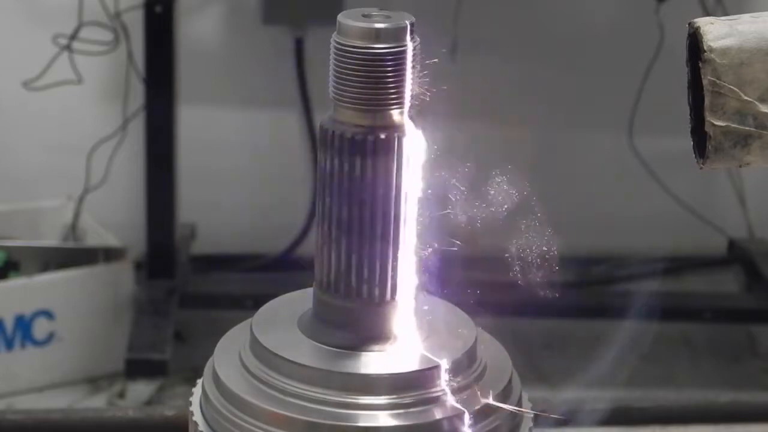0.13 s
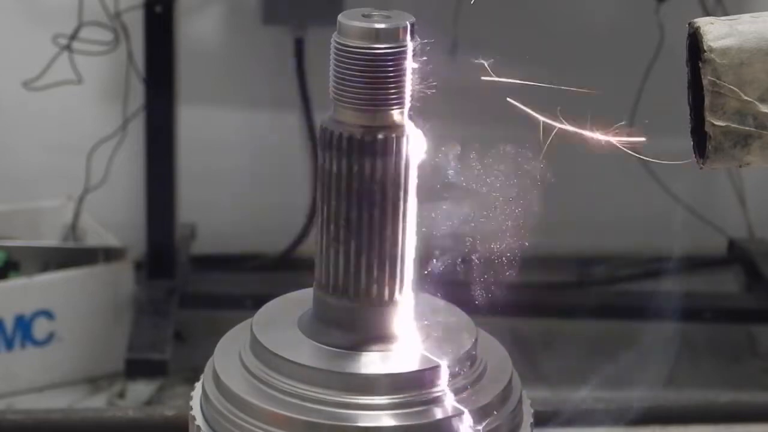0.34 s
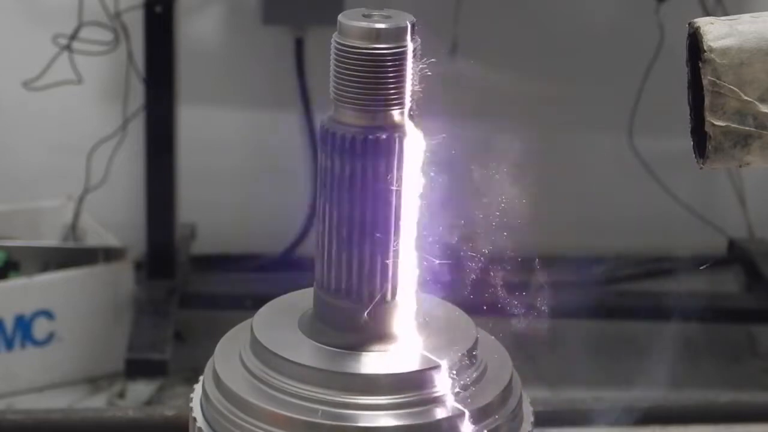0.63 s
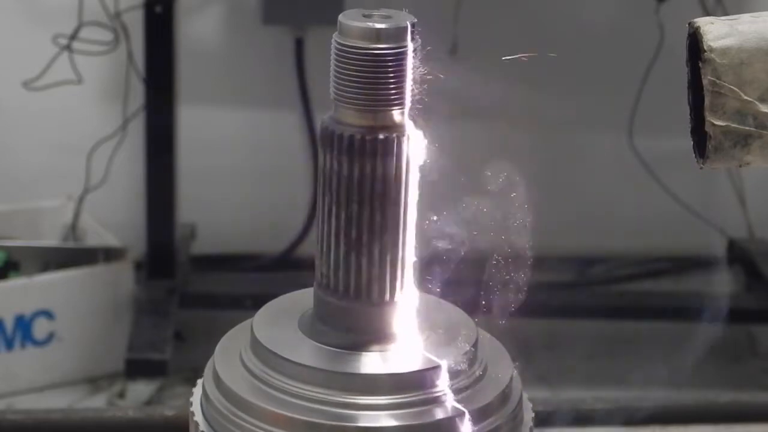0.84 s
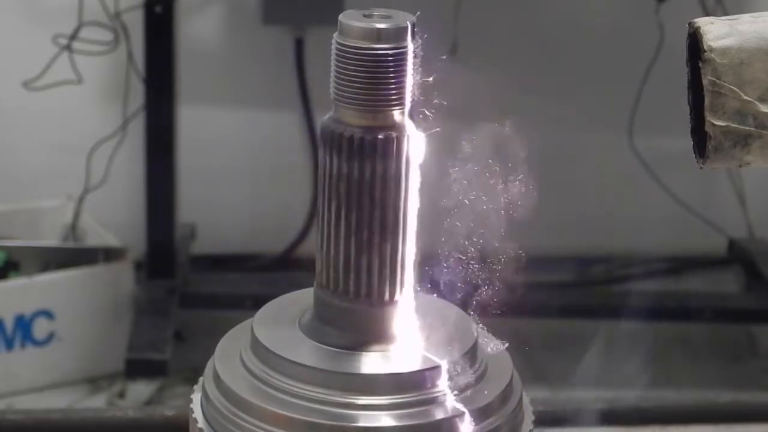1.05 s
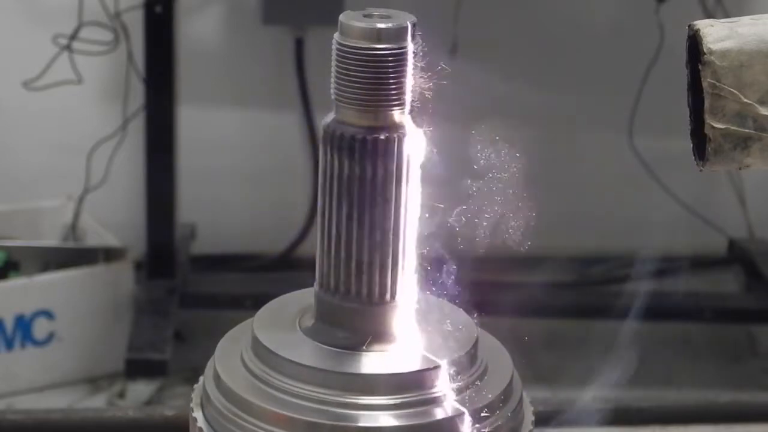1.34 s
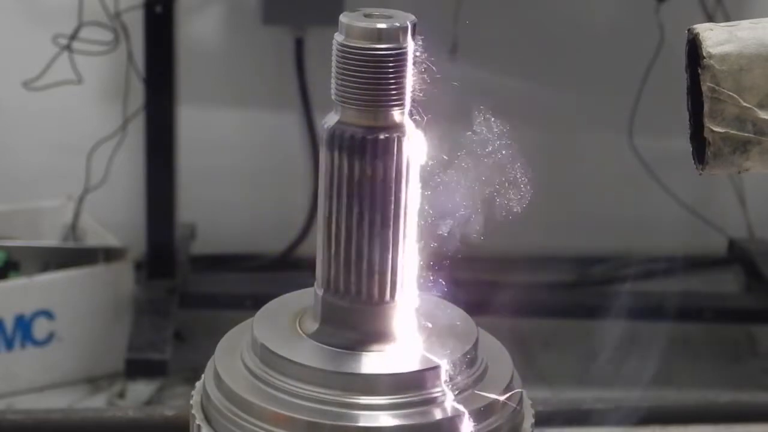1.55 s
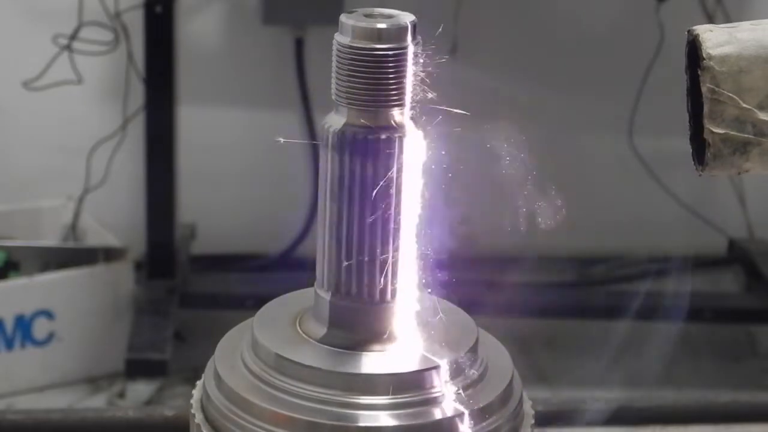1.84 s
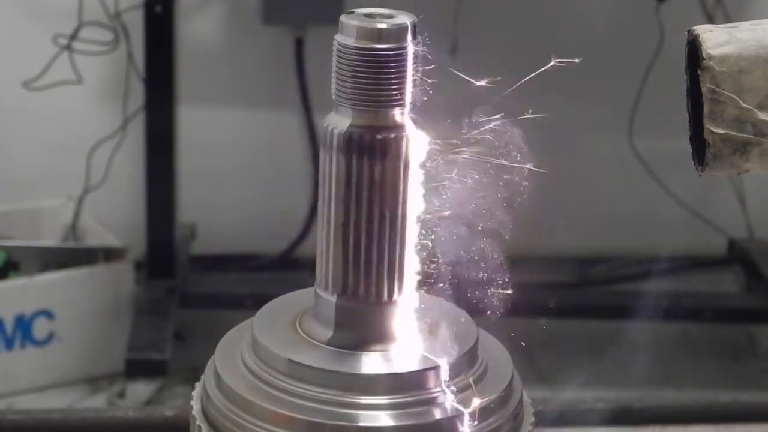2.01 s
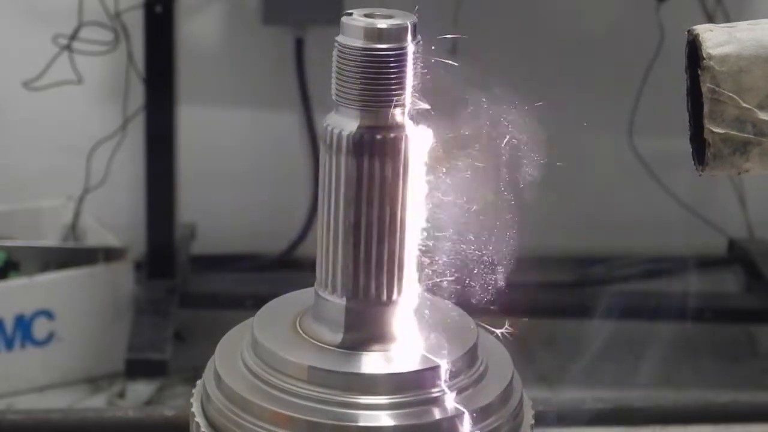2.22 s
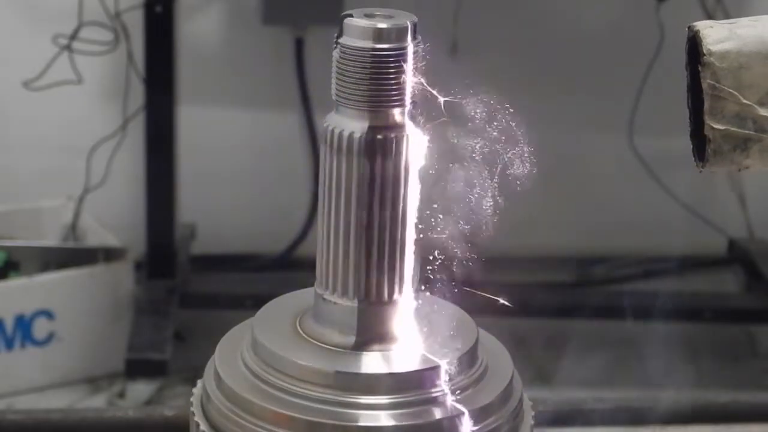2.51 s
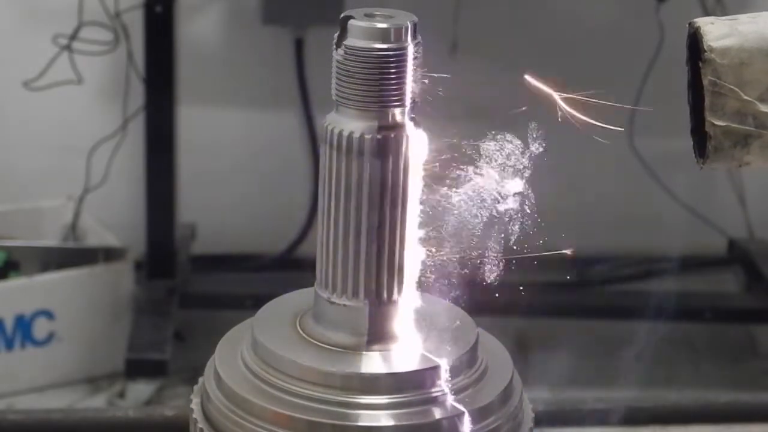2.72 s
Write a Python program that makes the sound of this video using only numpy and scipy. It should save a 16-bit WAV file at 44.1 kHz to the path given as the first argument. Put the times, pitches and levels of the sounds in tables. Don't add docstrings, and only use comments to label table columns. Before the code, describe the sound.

Hard, crackling electric-like buzz of laser cleaning on metal, with sputtering flares and a low pulsing drone.

```python
import sys
import numpy as np
from scipy import signal
from scipy.fft import rfft, irfft
from scipy.io import wavfile
from scipy.ndimage import uniform_filter1d

SR = 44100
rng = np.random.default_rng(int(sys.argv[2]) if len(sys.argv) > 2 else 0)


def voltage_ratio(level):
    return 10 ** (np.asarray(level, float) / 20)


def int16_out(signal):
    q = np.round(np.clip(np.atleast_2d(signal).T, -1, 1) * 32767)
    wavfile.write(sys.argv[1], SR, q.astype(np.int16))


N = 126126
TIME_S = np.arange(N) / SR
BIN_HZ = np.maximum(np.arange(N // 2 + 1) * SR / N, 1)
LEFT_RIGHT = np.array([[1], [-1]])

SWEEP_HZ, FIRST_SWEEP_S = 160.477, .005443
TURN_FIRST_S, TURN_S = .2415, .2417
GUST_LATE_S = .05


def level(x, db):
    return x * voltage_ratio(db) / np.sqrt(np.mean(x ** 2))


def read(table, hz):
    f, db = np.array(table).T
    return np.interp(np.log(hz), np.log(f), db)


def follow(table, t):
    return np.interp(t, *np.array(table).T)


def band(x, hz, width_hz):
    return signal.lfilter(*signal.iirpeak(hz, hz / width_hz, fs=SR), x)


def walk(rate, count=N, per_s=SR):
    hold = max(int(per_s / rate), 1)
    steps = np.repeat(rng.standard_normal(count // hold + 1), hold)
    return 2.19 * uniform_filter1d(uniform_filter1d(steps, hold), hold)[:count]


def clicks(times, sizes):
    out = np.zeros(N + 1024)
    at = times * SR + 512
    idx = np.floor(at)[:, None] + np.arange(-7, 9)
    off = idx - at[:, None]
    pulse = np.sinc(off) * np.cos(np.pi * off / 16) ** 2
    np.add.at(out, idx.astype(int), sizes[:, None] * pulse)
    return out[512:512 + N]


def air(table, flicker_db, rate, channels=1):
    out = 0
    for hz in 25 * 2 ** np.arange(0, 9.4, 1 / 3):
        octaves = np.log2(BIN_HZ / hz)
        shape = np.cos(np.pi / 2 * np.clip(3 * octaves, -1, 1)) * voltage_ratio(read(table, BIN_HZ))
        flicker = voltage_ratio(flicker_db * walk(rate))
        out = out + flicker * irfft(shape * rfft(rng.standard_normal((channels, N))), N)
    return out


def beat(late_s, ms):
    gap = (TIME_S - TURN_FIRST_S - late_s + TURN_S / 2) % TURN_S - TURN_S / 2
    return np.exp(-(gap * 1000 / ms) ** 2)


STROKE_S, STROKE_EDGE_S = .108, .008


def stroke():
    left = (TURN_FIRST_S + STROKE_EDGE_S - TIME_S) % TURN_S
    return uniform_filter1d(1. * (left < STROKE_S), size=int(2 * STROKE_EDGE_S * SR))


def room(x):
    t = np.arange(int(SR / 2)) / SR
    t60_s, room_db = .08, -18
    tail = rng.standard_normal(len(t)) * voltage_ratio(-60 * t / t60_s) * (t > .003)
    return signal.fftconvolve(x, tail / np.sqrt(np.sum(tail ** 2)))[:N] * voltage_ratio(room_db)


# f/Hz, level/dB
HISS_SPECTRUM = [(600, -17.5), (1500, -9), (2500, -4.5), (4700, 0.5), (6300, 2.5), (9000, -11), (13000, -6),
                 (14500, -29)]


def workshop_hiss():
    return level(air(HISS_SPECTRUM, 1.0, 6.83)[0], -30) * voltage_ratio(1.5 * stroke())


# f/Hz, side level/dB
HISS_WIDTH = [(500, 2), (1200, -4.5), (2500, -12.5), (3500, -14.5), (5200, -7.5), (7500, -29.5),
              (10000, -6.5), (12800, 0.5)]


def stereo_side(hiss, mid):
    other = np.roll(hiss, int(3 * TURN_S * SR))
    lean = .15
    return irfft(rfft(other + lean * mid) * voltage_ratio(read(HISS_WIDTH, BIN_HZ)), N)


# f/Hz, level/dB
DRONE_SPECTRUM = [(25, -13), (80, -10), (150, 6), (220, 7), (320, 0), (420, -10), (800, -18.5), (1600, -25)]


def extractor_drone():
    middle, apart = level(air(DRONE_SPECTRUM, 0.67, 6.04, channels=2), -39.5)
    rumble = level(band(apart, 35, 30), -62)
    drone_left_db, side_db = 3, -12.5
    stereo = middle + LEFT_RIGHT * (voltage_ratio(side_db) * apart + rumble)
    return stereo * voltage_ratio(LEFT_RIGHT * drone_left_db / 2)


def extractor_puffs():
    puff_db, puff_ms, weak_db = -31.5, 2.1, -7
    k = np.arange(-2, 33)
    db = puff_db + weak_db * (k % 3 > 0) - 5.0 * (k % 3 == 1)
    size = voltage_ratio(db + 1.7 * rng.standard_normal(len(k)))
    gap = (TIME_S - (TURN_FIRST_S + k[:, None] * TURN_S / 3)) * 1000 / puff_ms
    return -(size[:, None] * np.exp(-gap ** 2)).sum(axis=0)


def fume_thud():
    rush = band(rng.standard_normal(N), 870, 390)
    gust = beat(GUST_LATE_S, 17.5) * voltage_ratio(2.3 * walk(4.85)) * rush
    thud_left_db = 5.5
    return level(gust, -51) * voltage_ratio(LEFT_RIGHT * thud_left_db / 2)


def sweep_tones(t, table):
    n = len(t)
    when = np.r_[t[0] - 1 / SWEEP_HZ, t, t[-1] + 2 / SWEEP_HZ]
    turns = np.interp(TIME_S, when, np.r_[-1, np.arange(n), n + 1])
    out = 0
    for k, db, lag in table:
        tone = np.cos(2 * np.pi * round(k) * turns - lag)
        out = out + np.sqrt(2) * voltage_ratio(db + 1.8 * walk(25.36)) * tone
    return out


# multiple of the sweep, level/dB, lag/rad
WHINE = [(2, -41.5, 0.94), (4, -52.5, 1.1)]


def extractor_motor(t):
    start_db, end_db = 4.5, 10
    swell = start_db * beat(2 * STROKE_EDGE_S - STROKE_S, 14) + end_db * beat(-0.005, 10)
    rush = level(band(rng.standard_normal(N), 540, 480), -45.5)
    return stroke() * voltage_ratio(swell) * (sweep_tones(t, WHINE) + rush)


# multiple of the sweep, level/dB, lag/rad
HUM = [(1, -55, -0.49), (2, -45, 0.48), (3, -55, -0.028), (4, -58.5, 0.79), (5, -62.5, -0.2)]


def sweep_hum(t):
    surge_db, hum_left_db = 7, 2.5
    swell = voltage_ratio(surge_db * beat(GUST_LATE_S, 19) + LEFT_RIGHT * hum_left_db / 2)
    return sweep_tones(t, HUM) * swell


# t/s, lateness/ms
MIRROR_DRIFT = [(0.012, 0.91), (0.143, 0.54), (0.23, 0.14), (0.305, 0.04), (0.348, -0.16), (0.379, -0.16),
                (0.448, -0.38), (0.504, -0.27), (0.56, -0.04), (0.641, 0.04), (0.697, -0.13),
                (0.741, -0.06), (0.797, -0.12), (0.853, -0.43), (0.903, -0.38), (0.984, -0.45),
                (1.171, -0.17), (1.227, -0.15), (1.277, -0.23), (1.351, -0.07), (1.414, 0.19), (1.476, 0.1),
                (1.563, 0.28), (1.582, 0.25), (1.613, 0.01), (1.657, -0.03), (1.694, -0.16), (1.738, -0.01),
                (1.806, -0.19), (1.937, 0.0), (1.981, -0.31), (2.031, -0.25), (2.062, -0.11),
                (2.162, -0.08), (2.311, 0.18), (2.355, 0.01), (2.417, 0.13), (2.473, -0.06), (2.585, 0.29),
                (2.648, 0.27), (2.685, 0.17), (2.741, 0.3), (2.803, 0.24), (2.835, 0.13)]


def sweeps():
    t = FIRST_SWEEP_S + np.arange(int(N / SR * SWEEP_HZ)) / SWEEP_HZ
    jitter_ms, sway_ms = .013, .012
    shake = jitter_ms * rng.standard_normal(len(t)) + sway_ms * walk(40, count=len(t), per_s=SWEEP_HZ)
    return t + (follow(MIRROR_DRIFT, t) + shake) / 1000


# t/s, level/dB
SPLINE_RING = [(0, 3), (.6, -0.5), (1.4, -0.5), (1.6, -2.5), (2.2, -6.5), (2.86, -.5)]


def ring_splines(x):
    return x + (voltage_ratio(follow(SPLINE_RING, TIME_S)) - 1) * band(x, 6280, 270)


# place/ms, polarity, level/dB
SHOULDERS = [
    (-2.63, 1, -4.5),
    (-1.72, 1, -14),
    (-1.44, -1, -1),
    (-.93, -1, -16),
    (-.55, -1, -14),
    (-.03, 1, 0),
    (.84, 1, -11),
    (1.04, -1, -5.5),
    (2.02, -1, -13),
]
# ring f/Hz, width/Hz, sputter level/dB
CRACKS = [(3700, 3900, -6), (3800, 4800, -9), (4240, 4100, -6), (4860, 1700, -18), (4400, 2600, -17),
          (4540, 2830, -3), (6340, 8000, -6), (3760, 4900, -10), (3780, 3900, -15)]
# t/s, stretch of their lead
STRETCH = [(0, .985), (1.1, .99), (1.7, 1.017), (2.86, 1.008)]
# t/s, level/dB
COATING = [(0, -23), (.25, -19.5), (.48, -20.5), (.62, -19), (.9, -20), (1.1, -20), (1.45, -19), (1.7, -20),
           (1.85, -17.5), (1.93, -20), (2.02, -18), (2.2, -19.5), (2.3, -20), (2.55, -21.5), (2.86, -18.5)]
# t/s, level/dB, length/ms
FLARES = [(.05, 11.5, 12), (.292, 6.5, 13), (.382, 11, 12), (.535, 8, 10), (.625, 11, 6.7), (.775, 1, 8.3),
          (.846, 4, 6), (1.017, 2.5, 12), (1.258, 3, 8), (1.5, 4.5, 6.2), (1.68, 2, 8), (1.742, 2, 7),
          (1.985, 8, 8.9), (2.224, 5.5, 10), (2.335, -4, 6), (2.467, 7.5, 8.2), (2.65, 3.5, 8),
          (2.726, 3.5, 9.2)]
# f/Hz, level/dB
SPUTTER_SPECTRUM = [(650, -28), (1150, -3), (2000, -2), (4700, 5.5), (6200, -4), (8500, -6.5), (12500, -6),
                    (15000, -23)]
# f/Hz, width/Hz, level/dB
SHAFT_RING = [(4740, 390, -4.5), (6100, 960, -9), (8160, 320, 4), (2225, 210, 0.5)]
# f/Hz, width/Hz, level/dB
BODY_RING = [(1168, 215, -2), (1966, 150, 2), (3028, 31, -1), (4648, 137, -2.5), (6170, 280, -1)]


def add_rings(x, table):
    return x + sum(voltage_ratio(db) * band(x, hz, width_hz) for hz, width_hz, db in table)


def laser(t):
    n = len(t)

    def drift(rate):
        return walk(rate, count=n, per_s=SWEEP_HZ)

    coat = follow(COATING, t)
    coat = coat - coat.mean()
    flakes = sum(db * np.exp(-((t - s) * 1000 / ms) ** 2) for s, db, ms in FLARES)
    flare_db = .9 * drift(50) + coat + flakes
    edge_jitter_ms, edge_wander_ms = .011, .014
    coat_on_crack, scatter_db, wander_db = .8, 1.2, 1.6
    crack, burst = 0, 0
    for (ms, sign, db), (hz, width_hz, spit_db) in zip(SHOULDERS, CRACKS):
        luck = rng.standard_normal((n, 3)).T
        lead = ms * follow(STRETCH, t) if ms < 0 else ms
        at = t + (lead + edge_jitter_ms * luck[0] + edge_wander_ms * drift(6.7)) / 1000
        size = voltage_ratio(db + coat_on_crack * coat + scatter_db * luck[1] + wander_db * drift(4.5))
        crack = crack + band(clicks(at, sign * size), hz, width_hz) * SR / width_hz
        burst = burst + np.abs(clicks(at, voltage_ratio(spit_db + flare_db + 0.49 * luck[2]) ** 2))
    crack = signal.lfilter(*signal.butter(2, 7800, fs=SR), crack)
    crack = add_rings(crack, BODY_RING)
    sputter_ms = .4
    burst = np.sqrt(signal.lfilter([1], [1, -np.exp(-1000 / (sputter_ms * SR))], burst))
    sputter = burst * air(SPUTTER_SPECTRUM, 1.6, 25.23)[0]
    sputter = add_rings(sputter, SHAFT_RING)
    return level(crack, -23.5) + level(sputter, -28.5)


def scene():
    t = sweeps()
    hiss = workshop_hiss()
    beam = laser(t)
    mid = ring_splines(beam + room(beam) + hiss)
    wide = mid + LEFT_RIGHT * stereo_side(hiss, mid)
    low = extractor_drone() + sweep_hum(t) + fume_thud()
    at_left = voltage_ratio(np.array([[0], [-20]]))
    return wide + low + (extractor_puffs() + extractor_motor(t)) * at_left


def roll_off(x):
    return signal.sosfilt(signal.butter(12, 15610, fs=SR, output="sos"), x)


def record(dry):
    limit, top_cut = .62, .35
    trimmed = signal.lfilter(*signal.butter(1, 15, "high", fs=SR), dry)
    rounded = limit * np.tanh(trimmed / limit)
    top = signal.sosfiltfilt(signal.butter(8, 14250, "high", fs=SR, output="sos"), rounded)
    return roll_off(rounded - top_cut * top)


dry = scene()
out = record(dry)
int16_out(out)
```